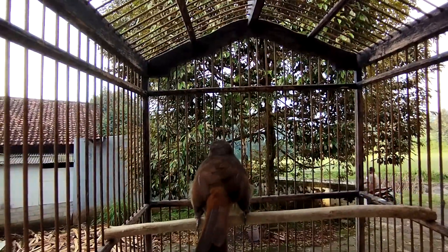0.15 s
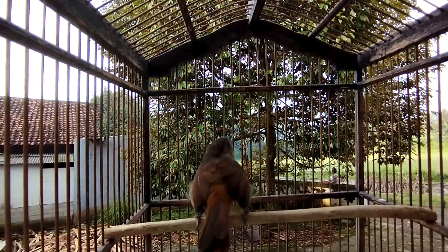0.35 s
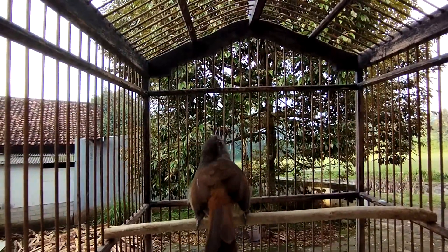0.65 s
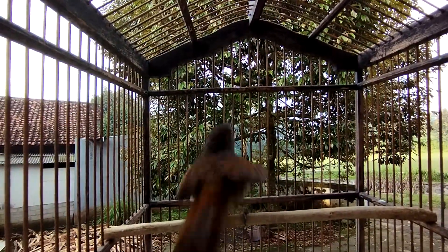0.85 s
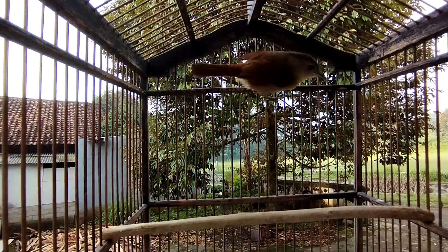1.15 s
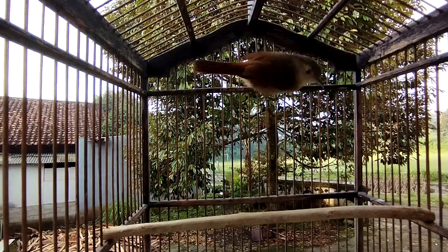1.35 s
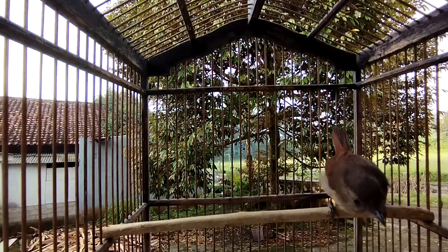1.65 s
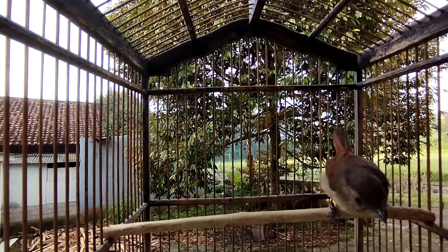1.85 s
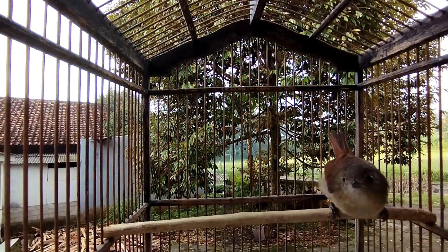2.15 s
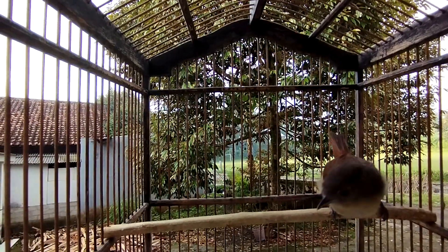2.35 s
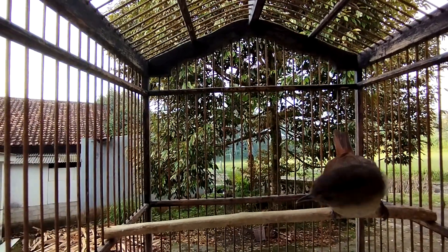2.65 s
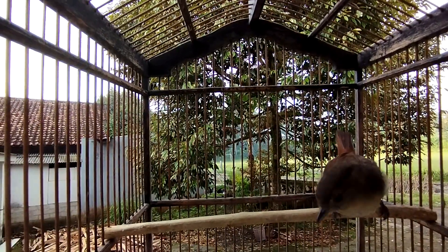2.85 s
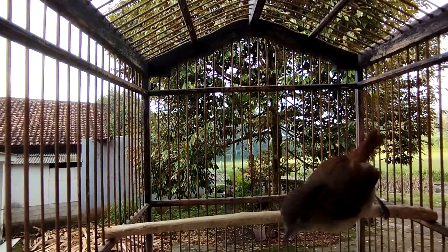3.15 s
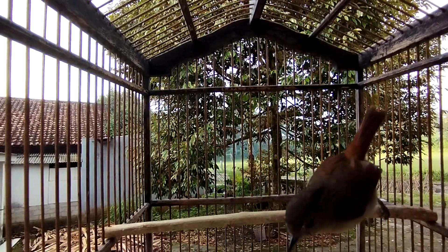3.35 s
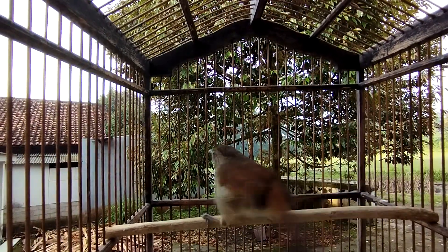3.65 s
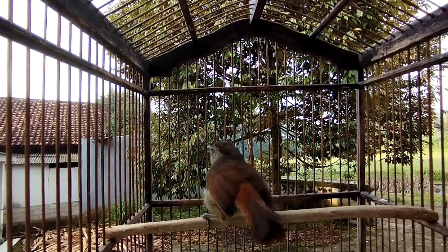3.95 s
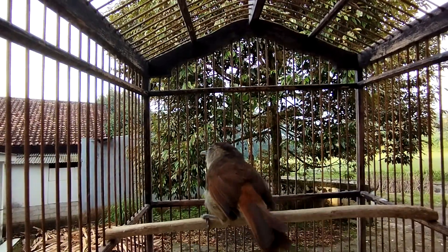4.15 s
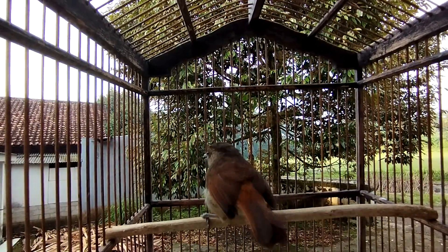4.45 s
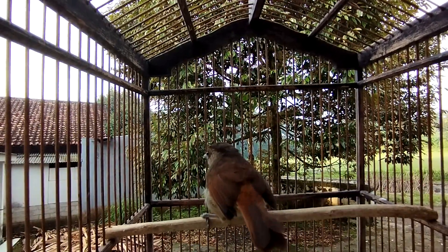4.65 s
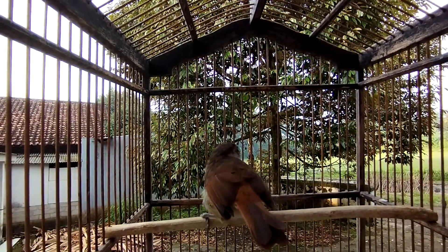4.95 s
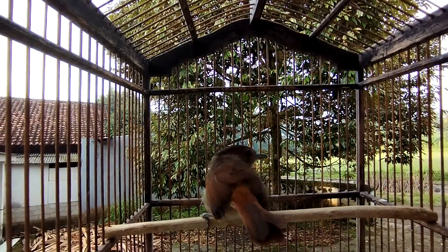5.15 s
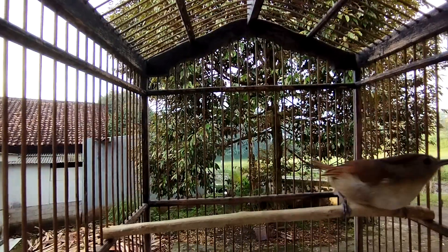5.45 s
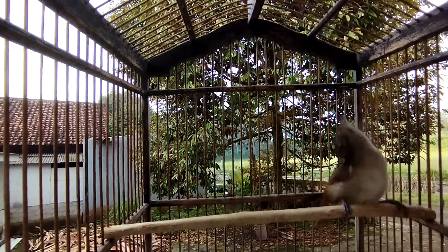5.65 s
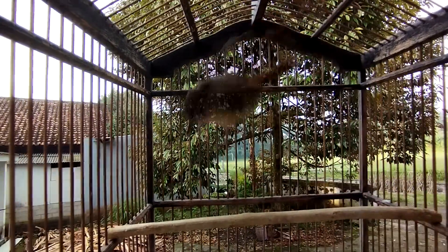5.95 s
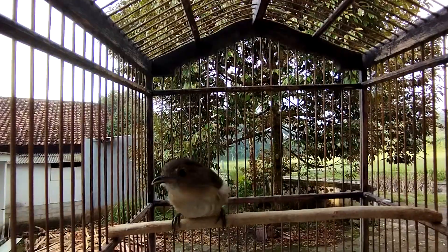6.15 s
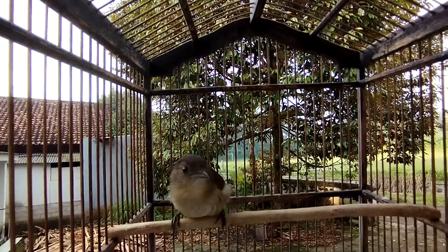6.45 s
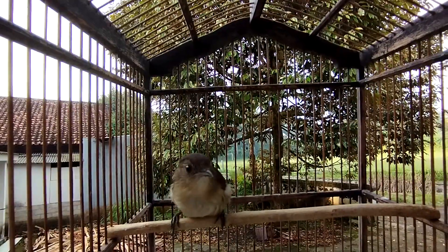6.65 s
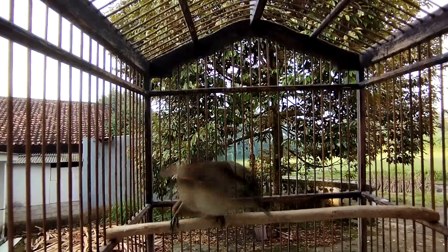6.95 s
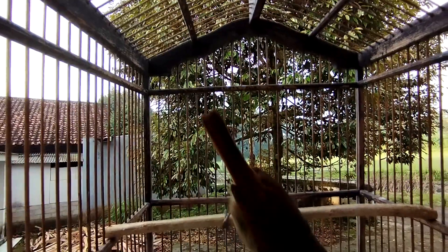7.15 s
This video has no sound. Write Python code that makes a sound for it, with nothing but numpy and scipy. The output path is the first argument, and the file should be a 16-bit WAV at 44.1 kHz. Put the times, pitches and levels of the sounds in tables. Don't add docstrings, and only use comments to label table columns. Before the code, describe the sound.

An outdoor yard heard in stereo from a phone close to a wooden birdcage. At the start a small single-cylinder motorbike is leaving on the right: a low puttering drone near 34 beats a second, tyre hiss, brief gravel crunch and faint chain rattle, mostly thinned by 1 s; the wavering drone keeps fading. Wing and claw ticks come at 1.2 s and light perch thumps around 1.6 s. Short trilled chirps near 3 kHz sound at 1.7 and 3.35 s. At 3.8 s another chirp opens a burst: a soft broken whistle, rapid paired flicked whistles growing louder from 4.0 to 4.4 s, a loud upward whistle, then three piercing buzzes around 5 kHz until 4.8 s, with a short yard echo. Faint perch ticks at 5.5 s; a steep chirp at 5.96, scratchy claws until 6.2, a quick rising sweep and an arching whistle at 6.3 s. Then faint insects, soft air and one tick at 7.2 s.

```python
import sys
import numpy as np
from scipy import signal
from scipy.fft import rfft, irfft, next_fast_len
from scipy.io import wavfile
from scipy.ndimage import uniform_filter1d

SR = 44100
rng = np.random.default_rng(int(sys.argv[2]) if len(sys.argv) > 2 else 0)


def to_linear_factor(level_db):
    exponent = np.asarray(level_db, float) / 20
    return 10 ** exponent


def wrap_up_sound(samples):
    columns = np.atleast_2d(samples).T
    tamed = np.clip(columns, -1, 1)
    steps = np.round(tamed * 32767).astype(np.int16)
    wavfile.write(sys.argv[1], SR, steps)


N = 321930
TIME = np.arange(N) / SR
LEFT_RIGHT = np.array([[1], [-1]]) / 2


def shaped(x, gain):
    size = next_fast_len(x.shape[-1])
    f = np.arange(size // 2 + 1) * SR / size
    return irfft(rfft(x, size) * gain(f), size)[..., :x.shape[-1]]


def unit(x):
    return x / np.sqrt(np.mean(x ** 2))


def curve(x, table):
    return np.interp(x, *np.transpose(table))


def ring(x, hz, width_hz):
    return unit(shaped(x, lambda f: 1 / (1 + ((f - hz) / (width_hz / 2)) ** 2)))


def walk(rate_hz):
    hold = int(SR / rate_hz)
    steps = np.repeat(rng.standard_normal(N // hold + 1), hold)
    return unit(uniform_filter1d(uniform_filter1d(steps, hold), hold)[:N])


def bell(s, spread_s):
    return np.exp(-((TIME - s) / spread_s) ** 2)


def wash(colour, alike_hz, anti):
    hz, db = np.transpose(colour)
    mid, side = rng.standard_normal((2, N))
    side = shaped(side, lambda f: 0.9 / (1 + (f / 45) ** 2) + anti * f ** 2 / (f ** 2 + alike_hz ** 2))
    sides = np.array([mid + side, mid - side])
    tint = lambda f: to_linear_factor(np.interp(np.log(f + 1), np.log(hz), db))
    out = 0
    for centre in 30 * 2. ** np.arange(10):
        octave = lambda f: np.clip(1 - abs(np.log2((f + 1) / centre)), 0, 1)
        flicker = to_linear_factor(1.3 * walk(6.9))
        out = out + shaped(sides, lambda f: octave(f) * tint(f)) * flicker
    return unit(out)


# (from t/s, left minus right level/dB, left lag/ms)
PERCHES = [
    (1.6, -4.5, 0.091),
    (3.3, -3, -0.0375),
    (3.78, -2.5, -0.087),
    (4., -5.5, -0.14),
    (4.4, -3.5, -0.15),
    (5.9, 0.5, -0.0795),
    (6.1, 3, -.21),
]
# (from t/s, half line level/dB, overtone level/dB, rasp level/dB, half line's share at the start)
VOICES = [(1.6, -18, -24.5, -16, .1), (3.3, -16.5, -25, -25, 0.06), (3.78, -24.5, -18, -25.5, 0.25),
          (3.9, -25.5, -17, -29.5, .3), (4., -38, -29, -29.5, 0.75), (4.14, -48, -31.5, -24, 0.43),
          (4.4, -55.5, -38.5, -23, .14), (4.45, -36.5, -19, -16, .25), (5.9, -28, -20, -22, 1.1),
          (6.1, -25, -14, -29, 0.23), (6.27, -14.5, -18.5, -38, 0.061)]
# (start t/s, end t/s, rise f/Hz, level at the top/dB)
FLICKS = [
    (3.939, 3.95, 1016, -7.5),
    (4.043, 4.066, 3640, -20.5),
    (4.086, 4.11, 3464, -20.5),
    (4.181, 4.2, 3505, -19),
    (4.226, 4.247, 3500, -22),
    (4.311, 4.33, 3400, -19.5),
    (4.359, 4.381, 3410, -22.5),
    (4.449, 4.461, 2070, -24.5),
]
FLICK_LEAN, FLICK_POINT = .8, 1.5
FLICK_HUSH_DB = -30.5
BEAK_HZ, BEAK_WIDTH_HZ, BEAK_DB = 3850, 486, 11.5
TRILL_LEAN = 0.14


def bird():
    out = np.zeros((2, N))
    for note, trill in song():
        at, *columns = np.transpose(note)
        _, pan_db, lag_ms = [row for row in PERCHES if row[0] < at[0]][-1]
        _, half_db, over_db, rasp_db, early = [row for row in VOICES if row[0] < at[0]][-1]
        first, last = int(at[0] * SR), int(at[-1] * SR)
        s = TIME[first:last]
        hz, db, *swing_hz = (uniform_filter1d(np.interp(s, at, c), size=45) for c in columns)
        if trill:
            dip_s, rate_hz, end_rate_hz, _, throb_db_per_khz = trill
            since = s - dip_s
            quickening = (end_rate_hz - rate_hz) / (at[-1] - at[0])
            turn = 2 * np.pi * (rate_hz * since + quickening * since ** 2 / 2)
            wobble = -np.cos(turn) - .25 * np.cos(2 * turn) - TRILL_LEAN * np.sin(2 * turn)
            reach = (.6 + rate_hz / 170) * swing_hz[0] * wobble
            hz = hz + reach - .45 * swing_hz[0]
            db = db + throb_db_per_khz * reach / 1000
        for start, end, rise_hz, top_db in FLICKS:
            through = np.clip((s - start) / (end - start), 0, 1)
            arch = np.sin(np.pi * through ** FLICK_LEAN) ** FLICK_POINT
            hz = hz + rise_hz * arch
            over_db = over_db + FLICK_HUSH_DB * np.clip(3 * arch, 0, 1)
            beak = np.exp(-((hz - BEAK_HZ) / BEAK_WIDTH_HZ) ** 2)
            db = db + top_db * arch ** 1.28 + BEAK_DB * np.clip(6 * arch, 0, 1) * beak
        tone = np.pad(syrinx(s, hz, db, half_db, over_db, rasp_db, early), 64)
        for port, sign in enumerate((1, -1)):
            late = shaped(tone, lambda f: np.exp(-1j * np.pi * f * sign * lag_ms / 1000))
            out[port, first - 64:last + 64] += late * to_linear_factor(sign * pan_db / 2)
    return out


# (f/Hz, level/dB)
THROAT = [(1000, -4), (3800, 1.5), (5000, 14), (5500, 9), (6300, -4.5), (7100, -3.5), (7900, -22.5),
          (9600, -5.5), (11200, -19), (13500, -5), (15500, -5.5)]
# (f/Hz, level/dB)
WINDPIPE = [(6300, -21), (7800, -37.5), (8700, -30.5), (9700, -9), (11000, -14), (12500, -9), (15000, -8.5),
            (16000, -5.5)]


def syrinx(s, hz, db, half_db, over_db, rasp_db, early):
    turn = 2 * np.pi * np.cumsum(hz) / SR
    throat = lambda k: to_linear_factor(curve(k * hz, THROAT)) * (k * hz < .45 * SR)
    swell = early + 1.3 * ((s - s[0]) / (s[-1] - s[0])) ** 4.5
    half_lines = sum(throat(k / 2) * 1.6 / np.sqrt(k) * np.sin(k * turn / 2) for k in (1, 3, 5))
    tone = np.sin(turn) + to_linear_factor(half_db) * swell * half_lines
    overtones = throat(2) * np.sin(2 * turn) + .55 * throat(3) * np.sin(3 * turn)
    overtones = to_linear_factor(over_db) * overtones
    flutter = unit(shaped(rng.standard_normal((2, len(s))), lambda f: 1 / (1 + (f / 900) ** 4)))
    air = unit(shaped(rng.standard_normal(len(s)), lambda f: (f > 6300) * to_linear_factor(curve(f, WINDPIPE))))
    breath = to_linear_factor(rasp_db - 12.5) * air * (1 + np.sin(turn / 26) / 2)
    rough_tone = tone * (1 + to_linear_factor(rasp_db - 5) * flutter[0])
    rough_overtones = overtones * (1 + to_linear_factor(rasp_db + 9) * flutter[1])
    fade = np.clip(np.minimum(s - s[0], s[-1] - s) / .0015, 0, 1)
    return np.sqrt(2) * (breath + rough_tone + rough_overtones) * to_linear_factor(db) * fade


# (first dip t/s, start rate f/Hz, end rate f/Hz, widest swing f/Hz, loudness throb level/dB per kHz)
TRILLS = [
    (1.704, 138, 101.8, 293, 5),
    (3.351, 114, 106, 295, 1),
    (3.8134, 160, 95.5, 318, 4),
    (5.959, 115.3, 95, 188, 2.5),
    (4.471, 210.4, 200, 328, 4),
    (4.5797, 206.8, 182, 349, 6),
    (4.7265, 194.6, 148.5, 350, 4.5),
    (6.19, 90.5, 80, 300, -0.5),
]
# (start t/s, length t/s, low pitch f/Hz, high pitch f/Hz, peak level/dB)
CHIRPS = [
    (1.702, 0.057, 2680, 3304, -30.5),
    (3.346, 0.053, 2783, 2988, -28),
    (3.808, 0.069, 2607, 3200, -31.5),
    (5.961, 0.051, 2940, 3850, -32.5),
]
BUZZES = [
    (4.466, 0.074, 4315, 5406, -9),
    (4.578, 0.078, 4190, 5307, -9.5),
    (4.705, 0.09, 4546, 5540, -11.5),
]
# (share of the length, share of the climb, level under the peak/dB, share of the swing)
CHIRP = [
    [(0, -0.41, -17, .05), (.1, 0.092, -10, .15), (.22, 0.18, -1.5, .3), (.36, 0.17, -3, .5),
     (.55, .67, -0.5, .85), (.74, .85, -3, 1), (.85, .8, -9.5, 1), (1, 1.2, -21.5, .9)],
    [(0, -0.5, -10, .02), (.1, -1.5, -5.5, .15), (.27, 0.25, 0, .4), (.5, 0.14, -1.5, .75),
     (.7, 0.64, -3.5, .9), (.86, 2, -11, 1.1), (1, 1, -27.5, .6)],
    [(0, 0.0031, -16, .02), (.08, -0.068, -4, .1), (.22, .1, 2.5, .3), (.36, 0.53, -1.5, .7),
     (.5, .7, -1.5, .8), (.7, .9, -5.5, .9), (.88, .85, -13, 1.1), (1, 0.6, -21, 0.55)],
    [(0, 0.11, -16, .1), (.1, 0.047, -7, .4), (.33, .2, -1, .8), (.55, .45, 0, 1), (.8, 0.89, -4, .6),
     (1, 1, -15.5, .8)],
]
BUZZ = [
    [(0, -.3, -6.5, 0.39), (.13, .2, -5, .8), (.3, .4, -4, 0.83), (.45, 0.61, -1, 0.62), (.72, 1, 1, 0.71),
     (.9, 0.93, 0, .9), (.95, 0.95, -5.5, .6), (1, 0.13, -19, .4)],
    [(0, -0.32, -15, 0.61), (.07, 0.00059, -13, .8), (.28, .4, -3.5, 1), (.5, .65, -5, .85),
     (.7, 0.93, 0, 0.87), (.9, 1, -1.5, 1), (1, -1, -27.5, 0.34)],
    [(0, -.6, -21, .6), (.07, -0.08, -11, .8), (.25, 0.1, -6, 1), (.48, .25, 1.5, .85), (.62, .62, -2, .9),
     (.88, 1, 0, 0.61), (.94, .5, -5, 0.98), (1, -1.5, -24, 0.53)],
]
# (t/s, centre pitch f/Hz, level/dB, trill swing f/Hz)
SWEEP = [
    (6.182, 2990, -48, 6),
    (6.189, 2928, -39.5, 24),
    (6.203, 3300, -31.5, 280),
    (6.219, 3930, -24.5, 94.5),
    (6.233, 4300, -25, 180),
    (6.248, 4780, -25, 45),
    (6.254, 4020, -50.5, 52.5),
]
# (t/s, pitch f/Hz, level/dB)
WHISTLES = [
    [(3.913, 2221, -62), (3.922, 2400, -35), (3.934, 2555, -32.5), (3.938, 3460, -32), (3.948, 3317, -33),
     (3.952, 3690, -26.5), (3.957, 3308, -36), (3.96, 2520, -33.5), (3.972, 2690, -46.5)],
    [(4.424, 2000, -45), (4.432, 2800, -22), (4.438, 3850, -7), (4.443, 4200, -14.5), (4.447, 4400, -8),
     (4.46, 4400, -8), (4.463, 4200, -10.5), (4.4675, 3900, -8.5)],
    [(6.2855, 3600, -50.5), (6.291, 3700, -27), (6.303, 4270, -25), (6.322, 4552, -19.5),
     (6.338, 4886, -24), (6.346, 4260, -40.5), (6.352, 3476, -36)],
]
# (start t/s, shelf reached t/s, shelf pitch f/Hz, shelf level/dB)
SYLLABLES = [
    (4.021, 4.047, 2661, -19.5),
    (4.067, 4.083, 2567, -22),
    (4.156, 4.179, 3786, -10),
    (4.205, 4.223, 3630, -15),
    (4.286, 4.309, 4064, -8),
    (4.328, 4.358, 3700, -13),
]
# (share of the time, share of the climb, level under the shelf/dB)
OPENING = [
    (0, -0.38, -25.5),
    (.33, 0.32, -13),
    (.57, .8, -6),
    (1, 1, -1),
]
SWIFT = [
    (0, -.3, -30.5),
    (.3, .2, -14.5),
    (.52, 0.74, -3),
    (.75, 1, 0),
    (1, 1.05, -1.5),
]
JOINED = [
    (0, 0.081, -8),
    (.27, 0.01, -14),
    (.62, .68, -5.5),
    (1, 0.92, -1),
]
# (t/s after the last shelf, pitch f/Hz, level/dB)
CLOSING = [
    (.022, 2657, -21.5),
    (0.03, 2270, -49.5),
]


def song():
    kinds = zip(CHIRPS + BUZZES, CHIRP + BUZZ, TRILLS)
    notes = [trilled(row, course, trill[3]) for row, course, trill in kinds] + [SWEEP]
    pairs = []
    for a, b, way in zip(SYLLABLES[::2], SYLLABLES[1::2], (OPENING, SWIFT, SWIFT)):
        close = [(b[1] + s, hz, db) for s, hz, db in CLOSING]
        pairs.append(climb(a, way) + climb(b, JOINED) + close)
    return list(zip(notes, TRILLS)) + [(whistle, None) for whistle in pairs + WHISTLES]


def trilled(row, course, swing_hz):
    start, length, low_hz, high_hz, peak_db = row
    return [(start + a * length, low_hz + up * (high_hz - low_hz), peak_db + db, wide * swing_hz)
            for a, up, db, wide in course]


def climb(row, course):
    start, shelf, hz, shelf_db = row
    low_hz = 1690 + .25 * hz
    return [(start + a * (shelf - start), low_hz + up * (hz - low_hz), shelf_db + db) for a, up, db in course]


# (lag/ms, level/dB)
CAGE = [
    [(.7, -16), (1.9, -13), (3.4, -15), (5.3, -18)],
    [(1.1, -17), (2.3, -17), (4.1, -20), (6.2, -21)],
]
YARD_T60_S, YARD_DB = 0.37, -15
NEAR_T60_S, NEAR_DB = .09, -18


def surroundings(x):
    t = np.arange(SR) / SR
    yard, bars = rng.standard_normal((2, 2, SR))
    tail = 1000 ** (-t / YARD_T60_S) * (1 - np.exp(-t / 0.06))
    response = to_linear_factor(YARD_DB) * yard * tail / np.sqrt(SR * YARD_T60_S / 14)
    response += to_linear_factor(NEAR_DB) * bars * 1000 ** (-t / NEAR_T60_S) / np.sqrt(SR * NEAR_T60_S / 14)
    response[:, 0] = 1
    for port, echoes in enumerate(CAGE):
        for ms, db in echoes:
            response[port, int(ms * SR / 1000)] += to_linear_factor(db)
    return signal.fftconvolve(x, response, axes=1)[:, :N]


# (t/s, firing rate f/Hz)
FIRING = [(0.0, 34.18), (0.43, 33.45), (1.24, 33.48), (1.34, 33.55), (2.38, 33.15), (3.64, 33.98),
          (3.74, 33.65), (4.55, 33.84), (4.65, 33.67), (6.02, 33.87), (6.55, 33), (7.3, 33.57)]
# (t/s, level/dB)
ROAD = [(0.0, -45), (0.22, -45.5), (0.46, -48.5), (0.87, -52.5), (1.34, -53), (1.69, -52), (2.34, -53.5),
        (2.71, -56), (2.9, -56.5), (3.52, -60), (4.0, -60.5)]


def motorbike():
    hz = curve(TIME, FIRING)
    turn = 2 * np.pi * np.cumsum(hz * (1 + .004 * walk(14))) / SR
    near_db = curve(TIME, ROAD) - 3 * np.clip(TIME - ROAD[-1][0], 0, None)
    return exhaust(turn, near_db) + road_hiss(turn, near_db) + gravel() + chain()


# (multiple, level at the start/dB, level/dB per s)
ORDERS_MAIN = [
    (2, -46, -1.2),
    (4, -40, -4.5),
    (5, -32.5, -3),
    (6, -36.5, -1.7152),
]
# (t/s, level change/dB, spread t/s)
PASSING_WALLS = [
    [(1.36, 5, 0.19), (2.3, 9, 1.9), (4.6, -14, 0.7)],
    [(0, 0.5, 0.036), (.35, 7.5, 0.15), (.65, -6, 0.033), (.91, -4.5, 0.046), (1.15, 9, 0.035),
     (1.45, 0, .1), (2.2, -15, 0.088), (3.1, -8, 0.15)],
    [(0, -1, 0.023), (.16, 9, 0.11), (.3, -8, 0.172), (.71, -13, 0.062), (.8, 5.5, 0.055),
     (1.63, -16.5, 0.053), (3.65, 6, 0.26), (4.0, -12, 0.16), (5.0, -8.5, 0.35), (6.34, -11, 0.096)],
    [(.06, -4.5, 0.2), (.3, 4.5, 0.091), (.91, -8, 0.11), (1.14, 2, 0.034), (1.4, -13.5, 0.044),
     (1.7, -16, 0.051), (1.85, 3.5, 0.083), (2.3, 5.5, 0.1), (3.3, -11, 0.512), (4.4, 3.5, 0.24),
     (6.7, -7.5, 0.16)],
]
# (multiple, level at the start/dB, level/dB per s)
ORDERS_LOW = [
    (1, -49, -2),
    (3, -46, -1.8),
]
# (multiple, level/dB)
ORDERS_HIGH = [
    (7, -22.5, ),
    (8, -17),
    (9, -20),
    (10, -30),
    (12, -27),
]


def exhaust(turn, near_db):
    orders = []
    for (k, db, fade_db), walls in zip(ORDERS_MAIN, PASSING_WALLS):
        passing_db = sum(change_db * bell(s, spread) for s, change_db, spread in walls)
        orders.append((k, db + fade_db * TIME + passing_db))
    orders += [(k, db + fade_db * TIME + 4.2 * walk(1.7)) for k, db, fade_db in ORDERS_LOW]
    orders += [(k, near_db + 15.5 + db + walk(1.4) - 2.9 * TIME) for k, db in ORDERS_HIGH]
    out = 0
    for k, db in orders:
        drift = .06 * k * walk(2.5) + 1.2 * walk(.6) - .066 * k * LEFT_RIGHT
        level = to_linear_factor(db + 1.54 * walk(12) - 0.184 * k * LEFT_RIGHT)
        out = out + np.sqrt(2) * level * np.cos(k * turn + drift)
    return out


# (f/Hz, level/dB per Hz)
ROAD_COLOUR = [(18, -39.5), (30, -13.5), (114, -11), (178, -10), (343, -20), (1000, -28), (1150, -26),
               (6980, -48), (8170, -68), (9820, -51.5), (10900, -72), (13800, -51.5), (15700, -64.5)]


def road_hiss(turn, near_db):
    puffs = 1 + 0.053 * np.cos(turn)
    hiss = wash(ROAD_COLOUR, alike_hz=1070, anti=1.15) * to_linear_factor(near_db + 7.0) * puffs
    hiss[0] = np.roll(hiss[0], 14) * to_linear_factor(-0.5)
    return hiss


# (t/s, spread t/s, f/Hz, width f/Hz, level/dB)
GRAVEL = [
    (0.22, 0.27, 1200, 970, -68.5),
    (0.248, 0.33, 2342, 1100, -54.5),
    (.25, 0.33, 3426, 1400, -54),
    (0.098, 0.41, 5230, 1900, -57),
    (2.3, 0.18, 500, 55.6, -58),
    (2.3, 0.65, 1390, 1100, -58),
]


def gravel():
    out = 0
    for s, spread, hz, width_hz, db in GRAVEL:
        grind = ring(rng.standard_normal((2, N)), hz, width_hz)
        out = out + to_linear_factor(db + 1.8 * walk(20)) * grind * bell(s, spread)
    return out


# (f/Hz, width f/Hz, level at the start/dB)
CHAIN = [
    (7100, 140, -63.5),
    (8850, 120, -67.5),
    (11670, 140, -67),
    (14400, 160, -62.5),
]


def chain():
    rattle = sum(to_linear_factor(db + 3 * walk(2.9)) * ring(rng.standard_normal((2, N)), hz, width_hz)
                 for hz, width_hz, db in CHAIN)
    return rattle * to_linear_factor(-9 * TIME)


# (t/s, peak level/dB, wood thump level/dB, length t/s)
TICKS = [(1.199, -54.5, -55, .02), (1.23, -56, -87.5, 0.0071), (1.618, -69, -56, .04),
         (1.642, -62.5, -60, 0.012), (1.705, -81, -51, .015), (1.861, -71, -70, 0.012),
         (5.455, -69, -65, .03), (5.531, -72, -59, .02), (5.938, -57, -76.5, 0.0037),
         (6.031, -55, -78, .004), (6.091, -53.5, -66, .003), (6.121, -59.5, -71, .003),
         (6.143, -53.5, -71, .004), (6.169, -65.5, -70, .006), (6.184, -57.5, -70, 0.024),
         (6.204, -58.5, -49, 0.045), (7.207, -68.5, -60, .01)]


def hops():
    bright = unit(shaped(rng.standard_normal((2, N)), lambda f: (f / 2000) / (1 + (f / 3500) ** 2)))
    wood = ring(rng.standard_normal(N), 706.0, 105)
    out = np.zeros((2, N))
    for s, peak_db, thump_db, length in TICKS:
        since = np.clip(TIME - s, 0, None)
        burst = (since > 0) * np.exp(-(since / length) ** 2)
        thump = to_linear_factor(thump_db) * wood * np.clip(since / 0.0032, 0, 1)
        out += burst * (to_linear_factor(peak_db) * bright + thump)
    return out


# (f/Hz, width f/Hz, level/dB, left minus right
# level/dB, pulse rate f/Hz)
INSECTS = [(1143, 55, -78, 4.5, 35), (2344, 110, -84.5, -4.5, 26), (3478, 140, -70.5, -4, 66),
           (4600, 470, -76, -6.5, 47), (6755, 440, -75, -8.5, 110), (9580, 1000, -73.5, -6.5, 140),
           (13170, 40, -77.5, 2, 54), (13730, 22, -66.5, -4.5, 43), (13630, 18, -72, -4, 3),
           (14030, 50, -75.5, 3, 50), (13640, 761, -69, -2, 60)]


def insects():
    out = 0
    for hz, width_hz, db, pan_db, rate_hz in INSECTS:
        level = to_linear_factor(db + pan_db * LEFT_RIGHT + 1.8 * walk(rate_hz) + 1.5 * walk(3))
        out = out + level * ring(rng.standard_normal((2, N)), hz, width_hz)
    return out


# (f/Hz, level/dB per Hz)
AIR = [(25, 8), (60, 0.5), (120, -1.5), (200, -3.5), (340, -19), (700, -22), (1500, -48), (3000, -40.5),
       (5500, -44.5), (7400, -42.5), (8200, -73.5), (11000, -67.5), (12500, -55), (15800, -55)]


def open_air():
    return to_linear_factor(-48.5) * wash(AIR, alike_hz=450, anti=0.88)


def scene():
    return surroundings(bird()) + motorbike() + hops() + insects() + open_air()


def low_pass(x):
    return signal.sosfilt(signal.butter(12, 15880, fs=SR, output="sos"), x)


HEADROOM = 1.7
SAG_DB, SAG_HZ = -12, 70
LEFT_PORT_HZ, LEFT_PORT_WIDTH_HZ, LEFT_PORT_DB = 13400, 2800, 16.5
TOP_HZ = 15830


def record(dry):
    port_db = lambda f: LEFT_PORT_DB * np.exp(-((f - LEFT_PORT_HZ) / LEFT_PORT_WIDTH_HZ) ** 2)
    rounded = HEADROOM * np.tanh(dry / HEADROOM)
    sound = shaped(rounded, lambda f: to_linear_factor(port_db(f) * LEFT_RIGHT) * (f < TOP_HZ))
    power = np.mean(dry ** 2, axis=0)
    sound += to_linear_factor(SAG_DB) * shaped(power, lambda f: (f > 15) / (1 + (f / SAG_HZ) ** 2))
    return low_pass(sound)


dry = scene()
out = record(dry)
wrap_up_sound(out)
```